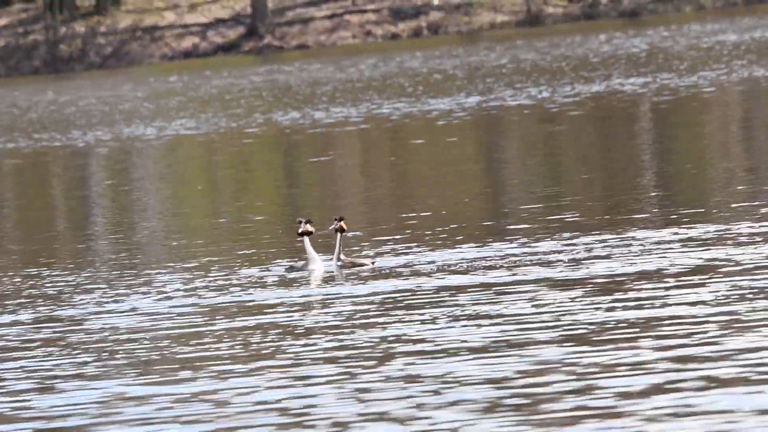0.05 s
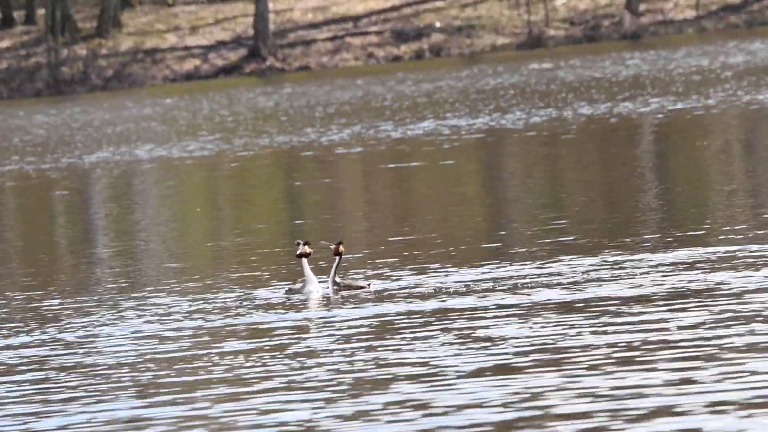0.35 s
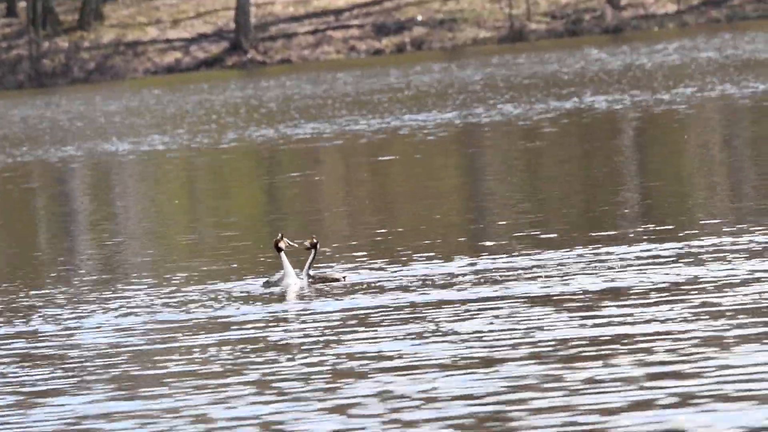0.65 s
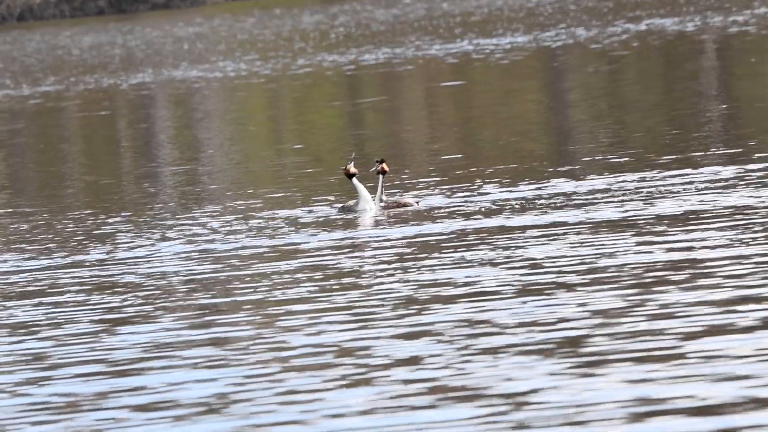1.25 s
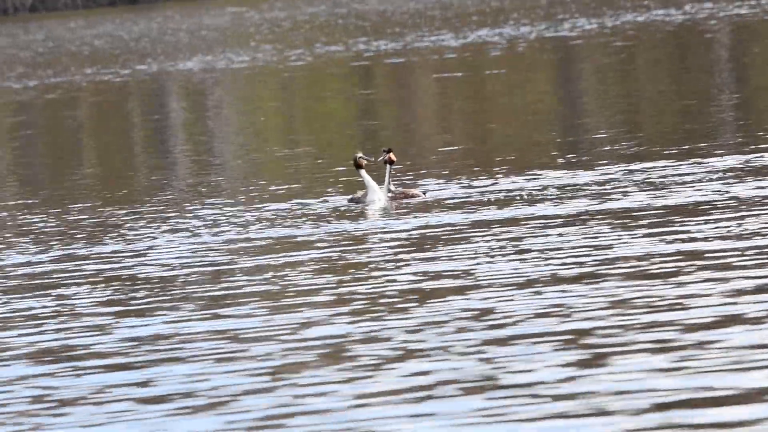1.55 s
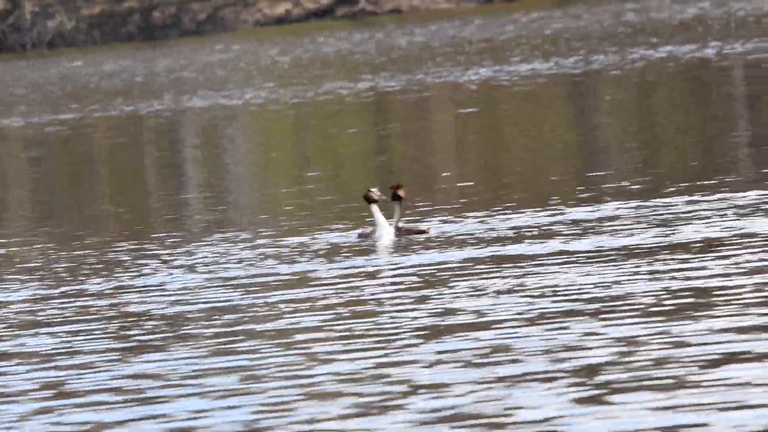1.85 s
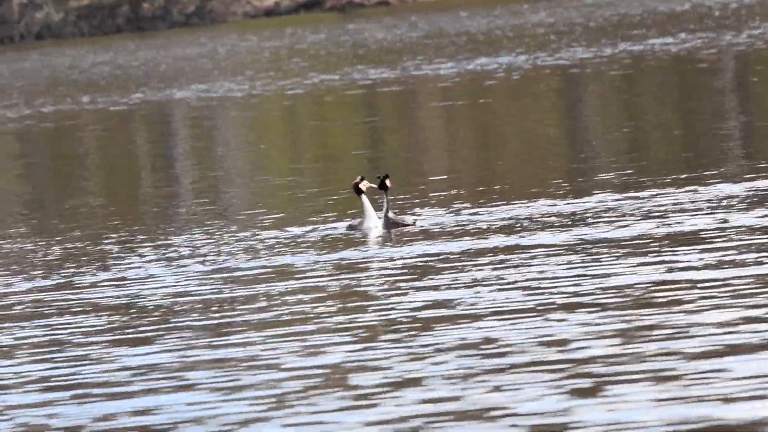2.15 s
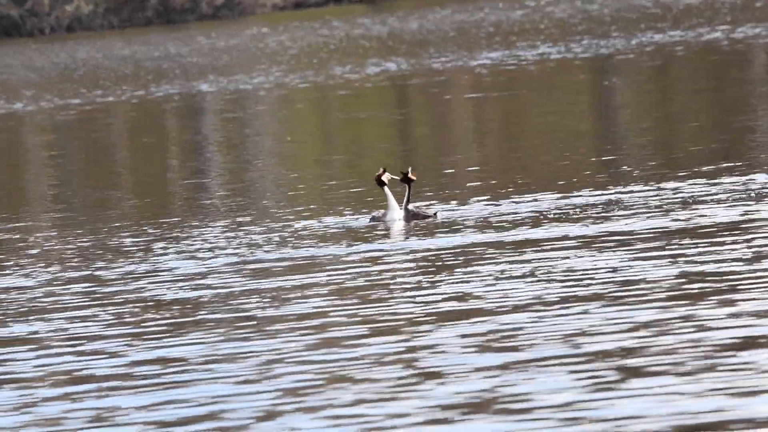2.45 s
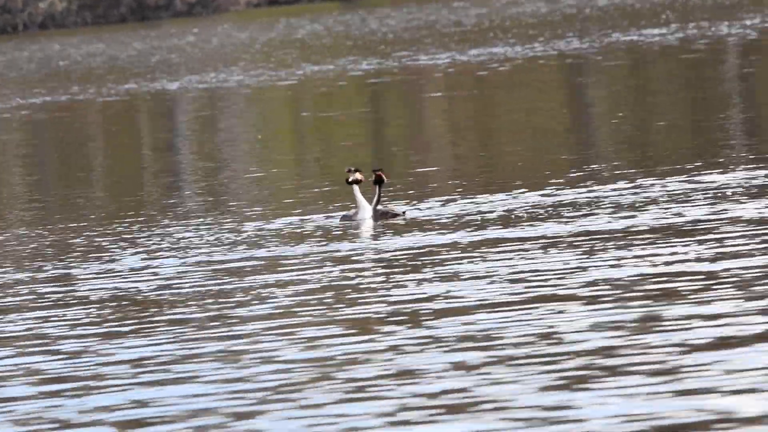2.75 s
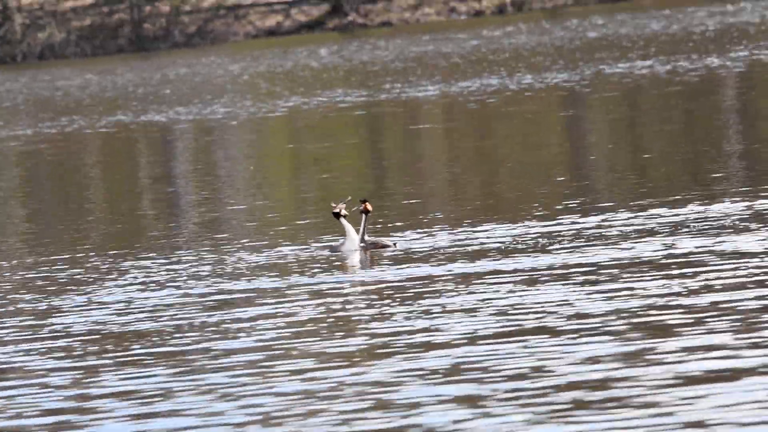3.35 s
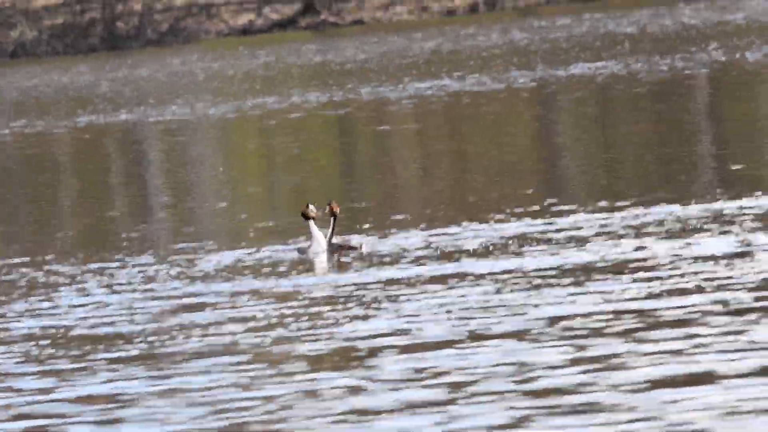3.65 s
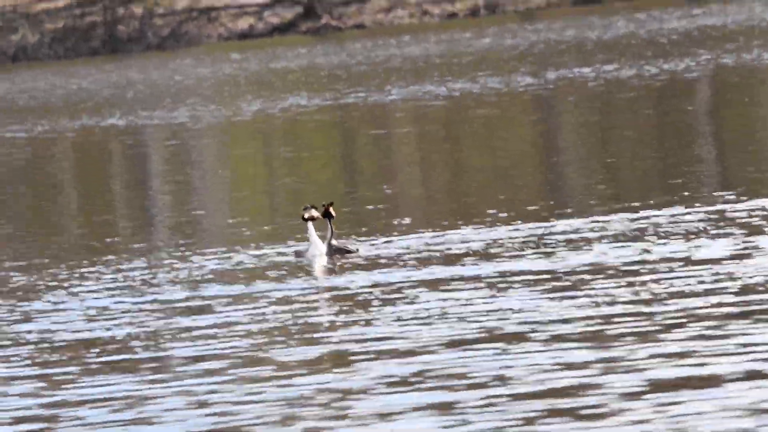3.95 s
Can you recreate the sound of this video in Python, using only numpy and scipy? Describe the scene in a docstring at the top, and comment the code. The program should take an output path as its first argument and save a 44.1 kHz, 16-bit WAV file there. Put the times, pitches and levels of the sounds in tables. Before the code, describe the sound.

Wind rumbles and puffs on the microphone over softly rippling water and faint bird calls.

```python
"""Gusty wind buffets the microphone on a lake shore, mostly its right port, with rumble and short puffs.
Water and trees make a steady wash. Far out, grebes give short arched 'kek' calls; a songbird whistles
and another bird adds thin nasal notes, all tones on a trembling pitch.
The wooded bank echoes the birds, and a few faint ticks sound nearby."""
import sys
import numpy as np
from scipy import signal
from scipy.fft import rfft, irfft, next_fast_len
from scipy.io import wavfile
from scipy.ndimage import uniform_filter1d, map_coordinates

SR = 44100
rng = np.random.default_rng(int(sys.argv[2]) if len(sys.argv) > 2 else 0)


def digitize_waveform(pressure):
    """Quantize a signal to 16-bit integers and store it at the path in sys.argv[1].

    Rows of a 2-D input are taken as channels; values are limited to [-1, 1].
    """
    field = np.atleast_2d(pressure).T
    bounded = np.clip(field, -1, 1)
    quanta = np.round(bounded * 32767).astype(np.int16)
    wavfile.write(sys.argv[1], SR, quanta)


N = 176400


def amp(db):
    """Decibels to gain."""
    return 10 ** (np.asarray(db) / 20)


def unit(x):
    """Scale to rms 1."""
    return x / np.sqrt(np.mean(x ** 2) + 1e-20)


def along(points, hz):
    """Interpolate (Hz, value) points on a log frequency axis."""
    knots_hz, values = np.transpose(points)
    return np.interp(np.log(hz + 1), np.log(knots_hz + 1), values)


def wobble(knots_per_s):
    """Smooth random curve."""
    knots = rng.standard_normal(int(N * knots_per_s / SR) + 4)
    return map_coordinates(knots, [np.arange(N) * knots_per_s / SR])


def filtered(x, response):
    """Apply a frequency response."""
    size = next_fast_len(N + SR // 2)
    return irfft(rfft(x, size) * response(np.fft.rfftfreq(size, 1 / SR)), size)[..., :N]


def noise(spectrum):
    """Coloured noise, rms 1."""
    return unit(filtered(rng.standard_normal(N), lambda hz: amp(along(spectrum, hz))))


def add(track, start_s, sound):
    """Mix a sound in at start_s."""
    part = track[max(0, round(start_s * SR)):][:len(sound)]
    part += sound[:len(part)]


def progress(length_s):
    """0 to 1 across a note."""
    return np.linspace(0, 1, max(8, int(length_s * SR)))


def note(pitch_hz, partials, jitter, jitter_per_s, swell_power):
    """Bird note: harmonics on a trembling pitch under a rounded swell."""
    n = len(pitch_hz)
    trembling_hz = pitch_hz * (1 + jitter * wobble(jitter_per_s)[:n])
    phase = 2 * np.pi * np.cumsum(trembling_hz) / SR
    swell = np.abs(np.sin(np.pi * np.arange(n) / n)) ** swell_power
    return swell * sum(amp(db) * np.sin(harmonic * phase) for harmonic, db in partials)


def buffet(gusts, spectrum, split_hz=199, small_swing=1.225):
    """Rumble on one port: large eddies follow the gusts, small ones swing wider, so gusts brighten."""
    times_s, gust_db = np.transpose(gusts)
    level_db = np.interp(np.arange(N) / SR, times_s, gust_db)
    rumble = noise(spectrum)
    local_power = np.abs(uniform_filter1d(rumble ** 2, size=2600))
    rumble = rumble / np.sqrt(local_power + 0.0067)
    large = filtered(rumble, lambda hz: 1 / (1 + (hz / split_hz) ** 4))
    swing_db = level_db - level_db.mean() + 1.6 * wobble(45)
    small = (rumble - large) * amp(small_swing * swing_db + 3.15 * wobble(70) - 0.5)
    return amp(level_db.mean()) * (large * amp(swing_db) + small)


# gusts at each port (time [s], relative level [dB])
RIGHT_GUSTS = [(0.0, -41.5), (0.08, -45), (0.17, -25.5), (0.22, -54), (0.24, -39.5), (0.44, -48),
               (0.59, -38), (0.61, -50), (0.67, -26.5), (0.72, -41), (0.78, -35), (1.19, -45),
               (1.22, -36.5), (1.28, -51), (1.54, -27.5), (1.66, -35.5), (1.74, -26.5), (1.97, -35.5),
               (2.02, -33), (2.07, -47.5), (2.21, -24), (2.44, -49), (2.53, -35.5), (2.86, -28.5),
               (2.91, -38), (3.14, -30), (3.29, -40), (3.66, -30), (3.97, -43.5), (4.0, -33)]
LEFT_GUSTS = [(0, -50), (.04, -37.5), (.15, -51), (.28, -39.5), (.38, -47), (.48, -38.5), (.6, -46),
              (1.15, -41.5), (1.24, -38.5), (1.33, -47), (2.12, -43.5), (2.24, -39), (2.45, -47.5),
              (2.68, -38), (2.78, -49.5), (2.97, -36), (3.1, -47), (3.5, -41.5), (3.7, -58), (4, -46)]
# rumble at each port (frequency [Hz], relative density [dB])
RIGHT_SPECTRUM = [(20, -43), (40, -13), (69, 1), (125, 2), (180, -6.5), (240, -12), (310, -21.5),
                  (600, -41.5), (900, -60), (3000, -85)]
LEFT_SPECTRUM = [(20, -27), (50, 0), (90, -8.5), (160, -14.5), (300, -27), (700, -28), (2000, -90)]


def wind(right_gain_db=6, leak_db=-30):
    """The right port takes gusts and puffs; the sheltered left rumbles lower, with a faint leak of them."""
    right = amp(right_gain_db) * buffet(RIGHT_GUSTS, RIGHT_SPECTRUM) + puffs()
    left = buffet(LEFT_GUSTS, LEFT_SPECTRUM) + amp(leak_db) * right
    return np.array([left, right])


# water and trees (frequency [Hz], relative density [dB])
WASH_SPECTRUM = [(25, -26), (60, -10.5), (120, -2), (250, 3), (450, 0), (700, -2), (1000, -3),
                 (1600, -11.5), (2200, -12.5), (3000, -16.5), (5500, -18), (7400, -22.5), (9500, -21),
                 (15500, -24)]
# stereo likeness of the wash (frequency [Hz], left-right correlation [-1..1])
WASH_CORRELATION = [(100, 1), (450, .75), (900, 0.43), (1300, 0.12), (1700, 0.057), (2300, -0.21),
                    (3300, -0.019), (4500, -0.025), (7000, 0.19), (14000, -0.044)]


def wash(level_db=-51, drift_db=0.67, pan_db=0.8):
    """Steady rush of ripples and trees: centred in the bass, wide in the hiss."""
    def mid_side_gains(hz):
        angle = np.arccos(along(WASH_CORRELATION, hz)) / 2
        return np.array([np.cos(angle), np.sin(angle)])

    mid, side = filtered(np.array([noise(WASH_SPECTRUM), noise(WASH_SPECTRUM)]), mid_side_gains)
    stereo = unit(np.array([mid + side, mid - side]))
    return amp(level_db + drift_db * wobble(2.91)) * stereo * amp([[-pan_db], [pan_db]])


# whistles (start [s], length [s], start pitch [Hz], middle pitch [Hz], end pitch [Hz], relative level [dB])
SONG_WHISTLES = [(0.016, 0.023, 4250, 3800, 3540, -60.5), (.05, .19, 3380, 3214, 3350, -67),
                 (0.088, 0.033, 6850, 6400, 5760, -62), (0.204, 0.017, 7560, 6600, 5000, -63),
                 (0.227, 0.024, 4780, 4480, 4600, -61.5), (0.321, 0.077, 3030, 2950, 2820, -65.5),
                 (0.413, 0.031, 3910, 4130, 5000, -61.5), (0.469, 0.0344, 5800, 5380, 5210, -63),
                 (0.54, 0.032, 3940, 3750, 4000, -63), (2.73, .14, 3000, 3800, 4200, -73),
                 (2.85, 0.1, 3000, 3600, 4000, -75)]


def songbird():
    """Quick slurred whistles: one sine gliding through three pitches."""
    out = np.zeros(N)
    for start_s, length_s, start_hz, middle_hz, end_hz, db in SONG_WHISTLES:
        parabola = np.polyfit([0, .5, 1], [start_hz, middle_hz, end_hz], 2)
        pitch_hz = np.polyval(parabola, progress(length_s))
        whistle = note(pitch_hz, [(1, 0)], jitter=0.035, jitter_per_s=800, swell_power=0.2)
        add(out, start_s, amp(db) * whistle)
    return out


# puffs (centre [s], half length [s], relative level [dB], upper corner [Hz])
EDDY_PUFFS = [(.098, .014, -27, 333), (.167, .036, -19.5, 540), (0.238, .016, -28.5, 310),
              (0.27, .016, -26, 246), (0.369, .012, -29, 410), (.58, 0.0115, -26.5, 405),
              (0.699, .02, -28, 368), (.795, 0.021, -24.5, 196), (0.903, .02, -26, 340),
              (1.525, .04, -18.5, 280), (1.772, 0.0077, -18.5, 260), (2.147, 0.019, -25.5, 328),
              (2.212, .03, -18, 350), (2.541, 0.026, -25.5, 340), (2.829, 0.0265, -31, 310),
              (3.06, .025, -22.5, 314)]


def puffs(bass_corner_hz=95.3, top_order=4.9, gain_db=-4):
    """Single eddies slap the right port: a few cycles of low rumble each."""
    out, size = np.zeros(N), 8192
    hz = np.fft.rfftfreq(size, 1 / SR)
    bass_hump = (hz / bass_corner_hz) ** 2 / (1 + (hz / bass_corner_hz) ** 3.3)
    for centre_s, half_s, db, top_hz in EDDY_PUFFS:
        n = int(2 * half_s * SR)
        colour = bass_hump / (1 + (hz / top_hz) ** top_order)
        eddy = irfft(rfft(rng.standard_normal(size)) * colour)[:n] * np.hanning(n)
        add(out, centre_s - half_s, amp(db + gain_db) * unit(eddy))
    return out


# grebe calls (centre [s], length [s], top pitch [Hz], relative level [dB],
# fundamental re octave [dB], rasp re octave [dB])
GREBE_KEKS = [(0.31, 0.029, 2428, -48.5, -7.5, -7), (.781, .028, 2469, -49, -2.5, -8),
              (1.415, .026, 2150, -58.5, -11, 1.5), (2.462, .028, 2423, -53, -6, -11),
              (2.927, .026, 2450, -53.5, -4, -9.5), (3.421, .031, 2422, -50, -2.5, -10),
              (3.882, .030, 2435, -50.5, -8.5, -6.5)]
# scratchy air in a kek (frequency [Hz], relative density [dB])
RASP_SPECTRUM = [(1300, -8), (2100, -0.5), (3000, -10), (4200, -3), (5300, -9), (7000, -14.5), (10000, -35)]


def grebes(peak_at=0.367, pitch_drop=0.276, arch_flatness=2.85, third_db=-26, rasp_stretch=1.7):
    """Each kek leaps up in pitch and falls; the octave is its strongest partial, and a rasp surrounds it."""
    out = np.zeros(N)
    air = noise(RASP_SPECTRUM)
    for centre_s, length_s, top_hz, db, fundamental_db, rasp_db in GREBE_KEKS:
        u = progress(length_s)
        from_peak = np.where(u < peak_at, (peak_at - u) / peak_at, (u - peak_at) / (1 - peak_at))
        pitch_hz = top_hz * (1 - pitch_drop * from_peak ** arch_flatness)
        partials = [(1, fundamental_db), (2, 0), (3, third_db)]
        kek = note(pitch_hz, partials, jitter=0.01, jitter_per_s=1140, swell_power=0.67)
        add(out, centre_s - length_s / 2, amp(db) * kek)
        n = int(len(u) * rasp_stretch)
        rasp = np.sqrt(np.hanning(n)) * air[round(centre_s * SR):][:n]
        add(out, centre_s - length_s * rasp_stretch / 2, amp(db + rasp_db) * rasp)
    return out


# nasal notes (start [s], length [s], start pitch [Hz], sag [fraction], relative level [dB],
# overtone gain [dB])
NASAL_NOTES = [(0.406, 0.082, 2136, 0.039, -65, 1), (1.486, 0.089, 2270, 0.076, -67, 2.5),
               (2.831, 0.044, 2288, 0.027, -64, -6)]
# their overtones (harmonic [number], relative level [dB])
NASAL_OVERTONES = [(2, -10), (3, -3), (4, 0.5)]


def nasal_bird(fade_db=8.5):
    """Thin buzzy notes that sag in pitch midway and fade."""
    out = np.zeros(N)
    for start_s, length_s, start_hz, sag, db, overtone_db in NASAL_NOTES:
        u = progress(length_s)
        pitch_hz = start_hz * (1 - sag * np.sin(np.pi * u * .85))
        partials = [(1, 0)] + [(harmonic, level + overtone_db) for harmonic, level in NASAL_OVERTONES]
        buzz = note(pitch_hz, partials, jitter=0.0304, jitter_per_s=830, swell_power=0.25)
        add(out, start_s, amp(db + fade_db * (.5 - u)) * buzz)
    return out


# faint ticks (time [s], level [dB])
NEAR_TICKS = [(1.118, -52.5), (2.898, -52), (3.038, -49)]
# their colour (frequency [Hz], relative density [dB])
TICK_SPECTRUM = [(2000, -32), (4500, 3), (5600, -1), (7300, -6), (9200, 6), (11000, -39), (15000, -36)]


def ticks(t60_s=.018):
    """Tiny dry clicks close by: bright noise, fast decay."""
    out = np.zeros((2, N))
    t = np.arange(SR // 20) / SR
    for start_s, db in NEAR_TICKS:
        for channel in out:
            add(channel, start_s, amp(db - 60 * t / t60_s) * noise(TICK_SPECTRUM)[:len(t)])
    return out


# decay of the wooded bank's echo (frequency [Hz], T60 [s])
BANK_T60 = [(500, 0.33), (3000, 0.58), (5000, 0.75), (10000, 0.1)]


def bank(call, tail_db, echo_s=(.014, .0161), echo_db=-11, pan_db=2.75):
    """Direct call and a quick reflection, both to the right, plus a diffuse tail from the trees."""
    bands_hz, t, bands = signal.stft(rng.standard_normal((2, SR)), SR, nperseg=256)
    decay = amp(-60 * t / along(BANK_T60, bands_hz)[:, None])
    impulse = signal.istft(bands * decay, SR, nperseg=256)[1]
    tail = signal.fftconvolve(call[None], impulse / np.linalg.norm(impulse[0]), axes=1)[:, :N]
    echo = filtered(call, lambda hz: np.exp(-2j * np.pi * np.outer(echo_s, hz)))  # left, right delay
    return (call + amp(echo_db) * echo) * amp([[-pan_db], [pan_db]]) + amp(tail_db) * tail


def scene():
    """Birds across the water, near ticks, the wash, and wind at the microphone."""
    birds = bank(grebes(), tail_db=-8.5) + bank(nasal_bird(), tail_db=-3) + bank(songbird(), tail_db=3)
    return birds + ticks() + wash() + wind()


BAND_LIMIT_HZ = 15720


def record(dry):
    """Brick-wall low-pass."""
    return filtered(dry, lambda hz: hz < BAND_LIMIT_HZ)


dry = scene()
out = record(dry)
digitize_waveform(out)
```